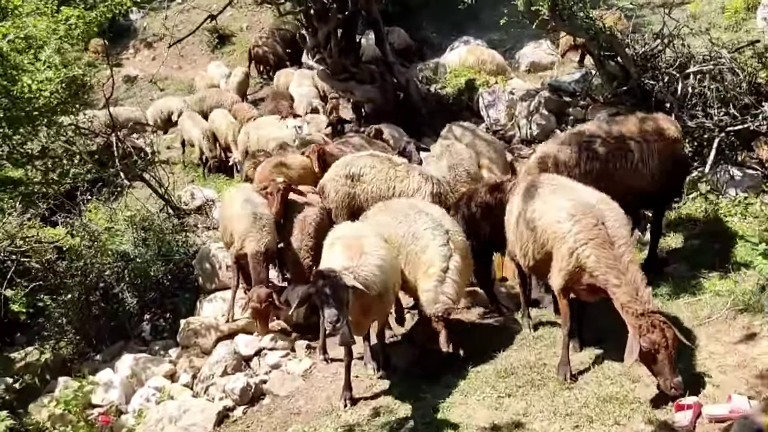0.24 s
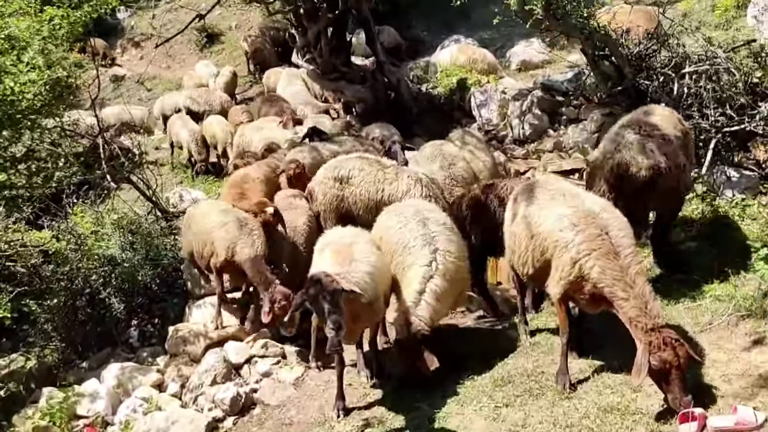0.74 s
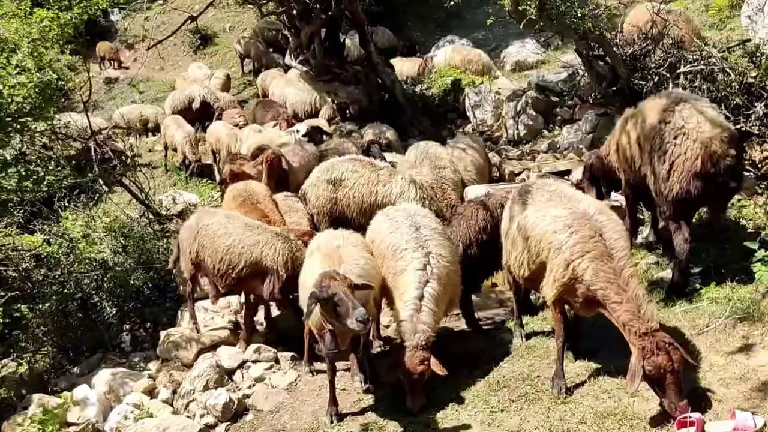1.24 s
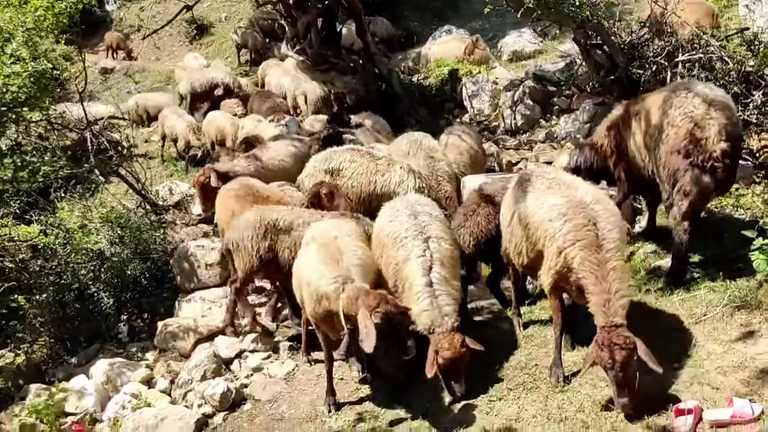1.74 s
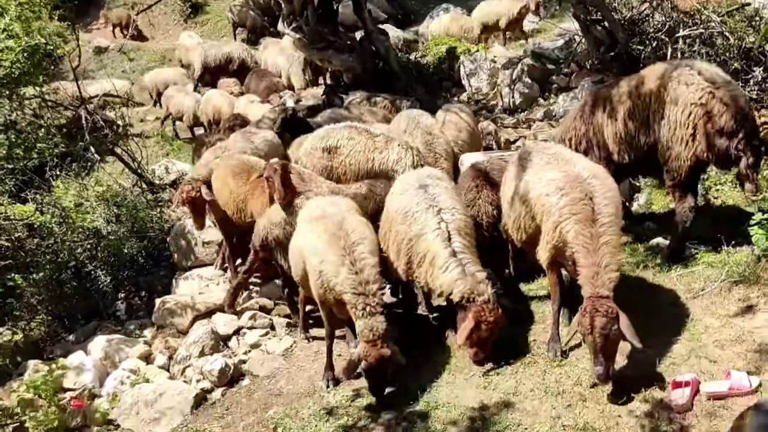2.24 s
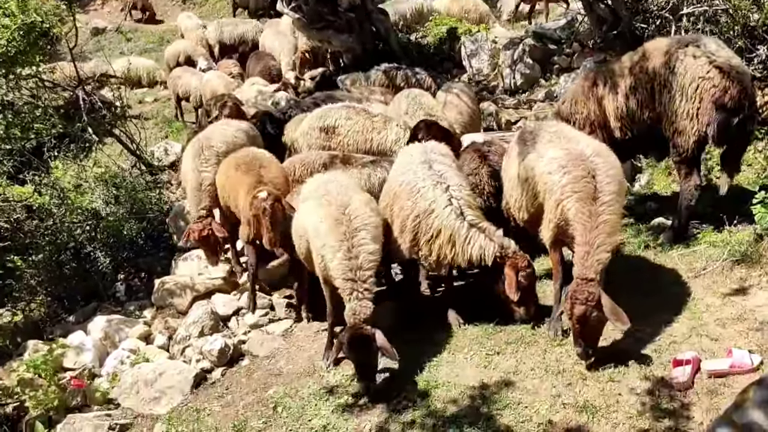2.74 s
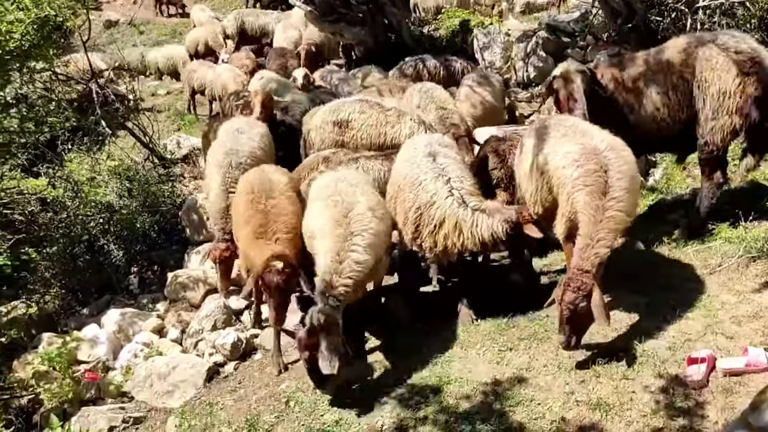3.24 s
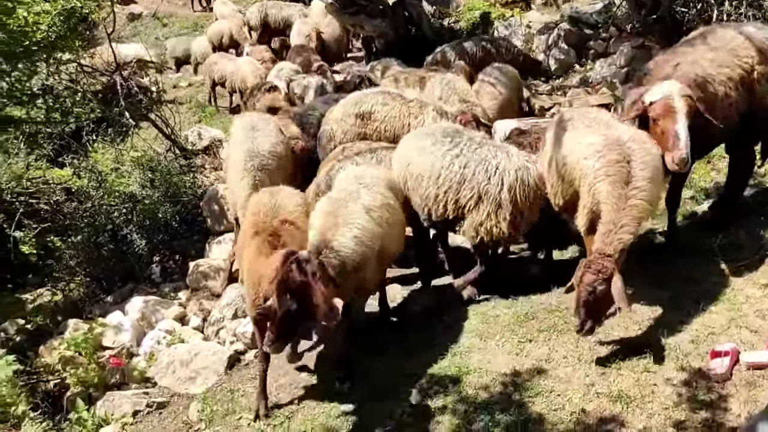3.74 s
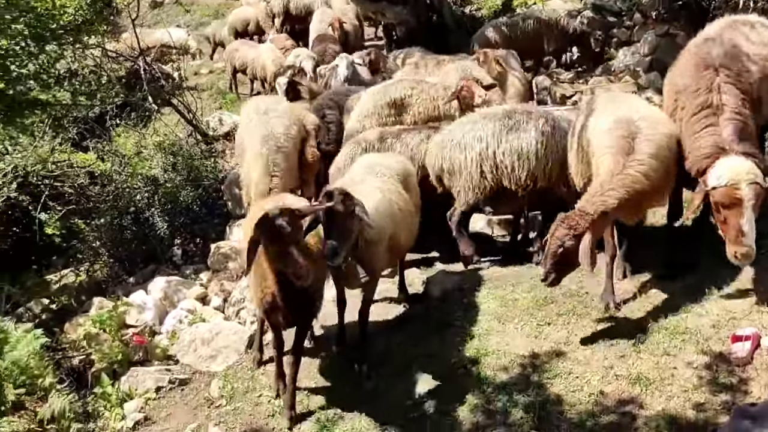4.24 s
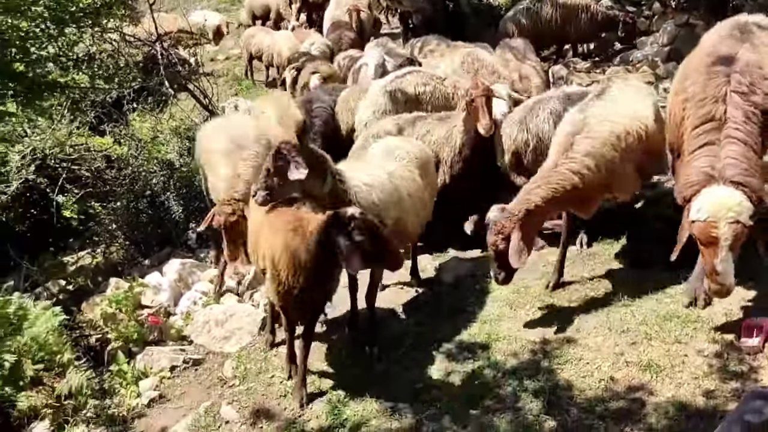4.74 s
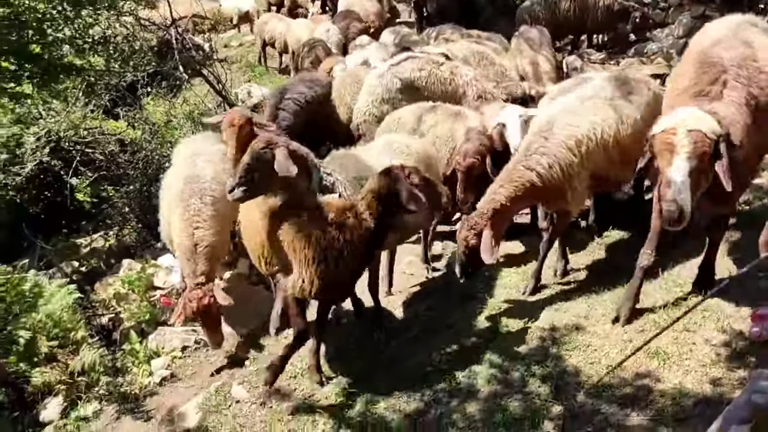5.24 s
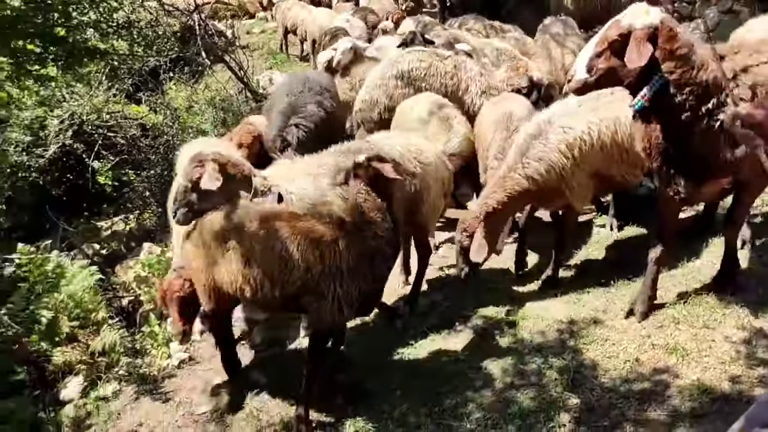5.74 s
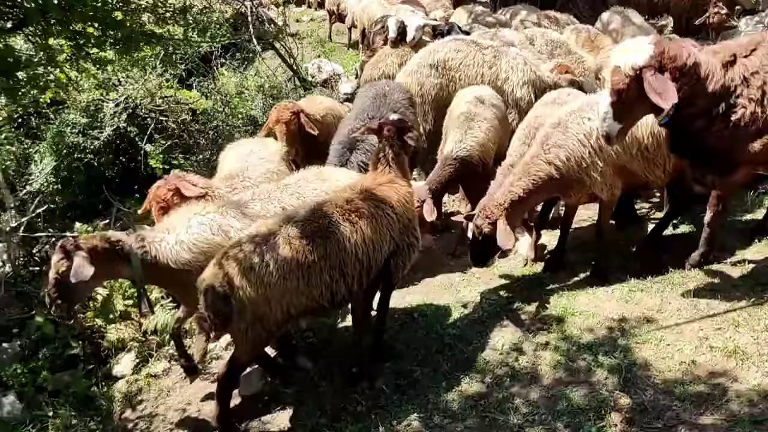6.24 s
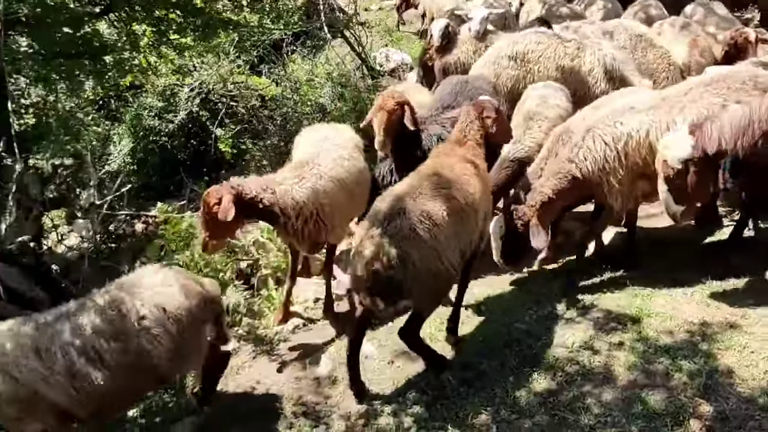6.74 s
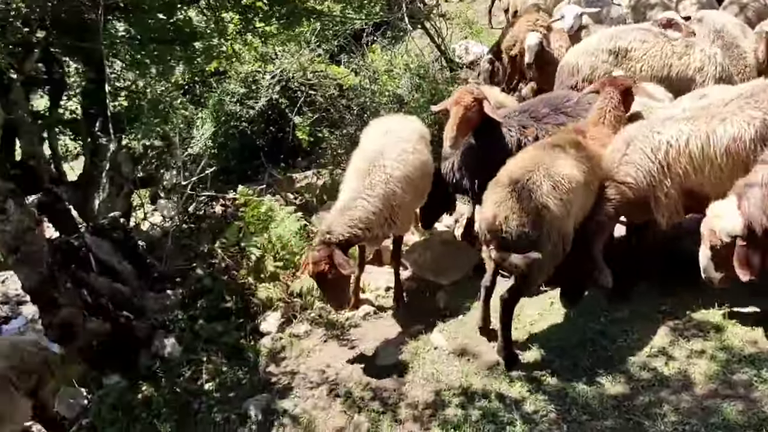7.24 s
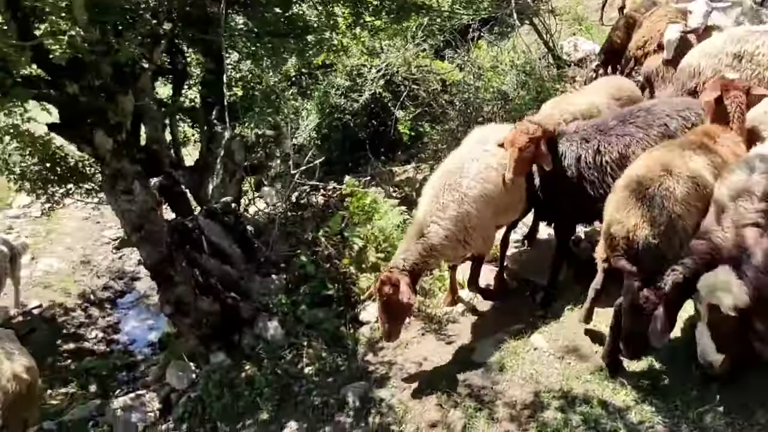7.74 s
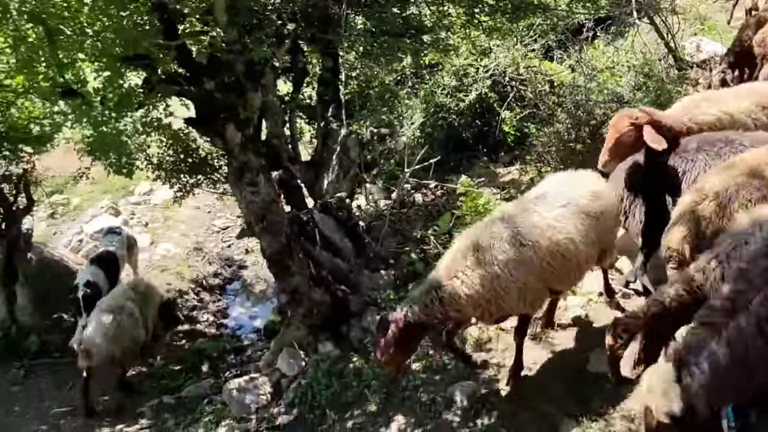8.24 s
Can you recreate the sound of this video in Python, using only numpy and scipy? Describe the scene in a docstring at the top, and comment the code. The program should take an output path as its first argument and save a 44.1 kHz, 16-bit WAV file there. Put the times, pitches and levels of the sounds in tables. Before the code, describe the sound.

A sheep's metal bell clanks close by over hoof knocks, rumbling wind, rustling and a hissing brook.

```python
"""Sheep shuffle over a dry hillside. From the start wind and trampling rumble, a brook hisses and far bells
clink; after a dry click a clapper strikes one close sheet-metal bell, sparsely at first. A small bird gives
a thin rising call at 1.2 s. Wool and cloth brush the microphone at 2.5 s. From 3 to 7 s the bell clanks
thick and fast; hooves knock on earth and stones, and another brush passes near 6 s. The clanks then thin
out, the bird calls twice more, and near 8 s the clapper clicks without ringing and a hoof thuds."""
import sys
import numpy as np
from scipy import signal
from scipy.fft import rfft, irfft, next_fast_len
from scipy.io import wavfile
from scipy.ndimage import map_coordinates

SR = 44100
rng = np.random.default_rng(int(sys.argv[2]) if len(sys.argv) > 2 else 0)


def log_audio(samples):
    """Write samples as a 16-bit WAV file to the path given in sys.argv[1]."""
    # one column per channel
    frames = np.atleast_2d(samples).T
    # limit to full scale, then quantise
    limited = np.clip(frames, -1, 1)
    pcm = np.round(limited * 32767).astype(np.int16)
    wavfile.write(sys.argv[1], SR, pcm)


N = 373968

# noise spectra: freq_hz, level_db
WIND_SPECTRUM = [(11, -9), (18, 4), (76, 0.5), (160, -14.5), (210, -63), (350, -120)]
TRAMPLE_SPECTRUM = [(50, -56), (100, -5), (170, -1.5), (260, -10), (400, -33), (900, -25.5), (2000, -37.5)]
BROOK_SPECTRUM = [(100, 3), (250, 7), (500, 5.5), (900, -0.5), (1500, -1.5), (3000, -15), (5000, -3),
                  (9000, 0.5), (14000, -56)]
RUSTLE_SPECTRUM = [(800, -19), (3000, -35), (4800, -17), (6000, -13), (7400, -3), (8500, 0.5), (10300, 1),
                   (11500, -6), (13800, -10)]
SHUFFLE_SPECTRUM = [(200, -2), (700, -12.5), (1900, -2), (3300, -9.5), (6000, -15)]
GRIT_SPECTRUM = [(200, 1), (600, 6), (1700, 1), (3000, -14.5), (9000, 4), (14000, -20)]
CLICK_SPECTRUM = [(400, -11.5), (1500, 4.5), (2300, 0), (3300, -4.5), (4600, 5.5), (6000, 2), (9500, 11),
                  (13800, 6.5)]
# envelopes: time_s, level_db
WIND_ENVELOPE = [(0.0, -26), (0.88, -34.5), (1.04, -46.5), (2.08, -43), (2.16, -37.5), (2.8, -50),
                 (2.9, -35.5), (3.2, -31.5), (3.28, -42), (3.52, -34), (3.84, -33.5), (3.92, -48),
                 (4.03, -28.5), (4.16, -43.5), (4.5, -39.5), (4.7, -30.5), (5.04, -45), (5.12, -32),
                 (5.36, -33), (5.56, -24.5), (6.96, -43.5), (7.44, -42), (7.52, -34.5), (8.0, -26.5),
                 (8.48, -40)]
RUSTLE_ENVELOPE = [(0.0, -40.5), (0.23, -45.5), (1.89, -50), (2.36, -40.5), (2.48, -33), (2.69, -46),
                   (3.12, -47.5), (5.34, -43), (5.6, -32.5), (5.88, -27), (6.02, -37), (6.21, -43),
                   (6.61, -38), (7.04, -45.5), (7.63, -45), (8.05, -39.5)]
# events: start_s, level_db
BIRD_CALLS = [(1.233, -44), (7.469, -46.5), (8.142, -41.5)]
DRY_CLICKS = [(0.021, -16), (5.3064, -24), (7.9203, -13)]
FAR_BLOWS = [(0.066, -39.5), (0.43, -48), (0.759, -47.5), (1.112, -45), (1.519, -48), (4.913, -51),
             (5.094, -45), (6.138, -45.5)]
# far bell modes: freq_hz, level_db, t60_s
FAR_MODES = [(938, 7.5, 0.47), (4290, -6, 0.19), (4600, -4, 0.22), (5250, 4, 0.57), (6680, -1, 0.21),
             (8200, 0.5, 0.18), (8600, 3.5, .2)]
# bells deep in the flock: cavity_hz, level_db
FLOCK_SIZES = [(796, -54), (823, -50), (902, -54), (932, -52)]
# close brushes: peak_s, width_s, level_db, start_hz, end_hz, width_oct
BRUSHES = [(2.464, 0.019, -24, 8900, 9300, 0.29), (2.506, 0.015, -25.5, 9100, 9100, 0.29),
           (2.486, 0.038, -30.5, 1700, 1490, 5.5), (2.906, 0.013, -42, 1640, 1700, 0.48),
           (5.926, 0.022, -21.5, 9500, 8100, 0.45), (5.945, 0.025, -30.5, 4900, 2730, 0.95),
           (5.025, 0.015, -48, 700, 700, 0.6), (7.495, 0.019, -37, 2540, 1980, 0.22)]
# one hard drag: peak_s, width_s, level_db
DRAG = (2.487, .036, -36.5)
# its resonances: centre_hz, width_hz, level_db
DRAG_MODES = [(228, 46, -9), (394, 42, -10), (578, 88, -17), (890, 160, -15)]
# hooves on earth: start_s, thud_db, grit_db
HOOF_FALLS = [(0.5, -33, -51), (2.91, -34, -41), (3.775, -24, -44.5), (4.772, -22, -53), (5.085, -26, -43),
              (7.957, -16.5, -49)]
# hooves on stone: start_s, push_db, knock_db
STAMPS = [(1.245, -55, -32.5), (5.33, -50, -38), (5.515, -19.5, -28), (5.725, -39, -28),
          (7.716, -19.5, -48)]
# near bell modes: freq_hz, level_in_family_db, left_right_db
NEAR_MODES = [(2842, 0, -1), (3025, 0, 0), (4094, -3, -4), (4352, -2, -7), (4618, -1, -7), (4826, -1, -7),
              (5297, -2, 1), (5372, -2, -2), (6000, -9, 0), (6110, -9, 0), (6331, -8, -2), (6815, -6, -6),
              (7400, -3, -10), (7604, -3, -12), (7950, -4, -12), (8512, 0, -11), (8590, -1, -9),
              (8700, -6, -8), (9625, -5, 2), (9855, 0, 9), (10030, -8, 5), (10514, -8, 7), (11315, -6, 6),
              (11709, -8, 6), (12000, -8, 7), (12269, -8, 5), (13400, -17, 3)]
# borders of the waist, wall, ring and shimmer families: freq_hz
FAMILY_EDGES_HZ = [3500, 6500, 9200]
# modes excited together: wall_hz -> waist_hz
COUPLED_MODES = {4826: 3025, 5372: 3025}
# dense modes of the dented sheet: freq_hz, level_db
CLANG_SPECTRUM = [(1500, -23), (2400, 6.5), (3400, -58), (4600, 18.5), (6000, 2.5), (8000, 23),
                  (11000, -15), (13700, -17)]
# near bell blows: start_s, ring_db, shimmer_db, wall_db, waist_db, cavity_db, click_db,
# favoured_ring_hz, favoured_wall_hz, second_wall_hz
NEAR_BLOWS = [(0.178, -28, -27, -34.5, -67, -50, -22.5, 7604, 4618, 4826),
              (1.287, -29.5, -27, -36, -77, -51, -40, 8590, 4618, 5180),
              (1.6484, -29.5, -31, -41, -67, -50, -26, 7604, 4352, 4826),
              (2.0346, -30.5, -34, -39.5, -89, -49.5, -28, 8590, 4826, 4618),
              (2.25, -14.5, -10.5, -27.5, -47, -23.5, -14.5, 7604, 5297, 4618),
              (2.341, -32, -28, -42, -68, -33, -26, 8512, 4618, 4826),
              (2.6402, -12.5, -12.5, -23.5, -36, -19, -13, 8590, 5297, 4618),
              (3.042, -23, -20, -27.5, -43, -41, -21.5, 8512, 4618, 5330),
              (3.1989, -16, -12, -20.5, -40, -27.5, -17, 7400, 4618, 4826),
              (3.3624, -16, -12, -27.5, -38.5, -21.5, -14.5, 7604, 4352, 4094),
              (3.457, -20, -22.5, -32.5, -67, -30, -20.5, 7400, 4826, 4352),
              (3.5352, -15, -27, -26.5, -40.5, -21.5, -20.5, 7604, 4094, 4826),
              (3.5964, -20.5, -22.5, -31.5, -56, -37.5, -28, 7604, 4352, 5300),
              (3.648, -28, -27, -38, -63, -29.5, -39, 8512, 4826, 5340),
              (3.8528, -10, -9, -22, -39, -16, -14, 7604, 4352, 4094),
              (3.919, -6, -13, -20.5, -35, -20, -12.5, 8512, 4826, 5280),
              (4.0713, -9.5, -7, -28.5, -41, -25.5, -23, 7950, 4618, 4826),
              (4.3007, -5, -10.5, -17.5, -51, -19, -19, 7950, 5372, 4352),
              (4.3998, -22, -26, -33, -57, -24, -27, 7604, 4826, 4094),
              (4.465, -6.5, -13.5, -29, -49, -33.5, -24, 7950, 5297, 4094),
              (4.4881, -17.5, -23, -26.5, -57, -40, -38, 7950, 4352, 5350),
              (4.6695, -20, -26.5, -37, -64, -25.5, -26, 8512, 5372, 4860),
              (4.7046, -19.5, -26, -43, -55, -32, -24, 8512, 4094, 4850),
              (5.6804, -10.5, -11, -29, -54, -39.5, -26, 7400, 5372, 5250),
              (6.0052, -17.5, -21, -33.5, -52, -33, -24, 7950, 4826, 5370),
              (6.2503, -25, -19, -34, -67, -34.5, -41, 8512, 4826, 4400),
              (6.3646, -19.5, -15, -27, -39, -25, -17.5, 7950, 5372, 4826),
              (6.388, -10.5, -22, -34, -47, -32, -41, 8512, 5297, 4826),
              (6.4218, -21, -31, -31, -56, -28, -41, 7950, 4826, 5200),
              (6.6205, -10, -15, -25.5, -49, -11, -16, 8512, 4826, 5460),
              (6.7315, -7.5, -11.5, -27, -40.5, -22, -23, 8512, 4618, 4352),
              (6.825, -33, -33, -34, -57, -37.5, -49, 7950, 4618, 4040),
              (6.943, -16, -12, -27, -43.5, -36, -26, 7950, 5372, 4826),
              (7.016, -20.5, -24, -31, -62, -27, -35, 8512, 4826, 5297),
              (7.1543, -10.5, -17.5, -28.5, -48, -31, -20, 8512, 5297, 4094),
              (7.3369, -25.5, -30, -37, -55, -32, -33, 8512, 4618, 4826),
              (7.664, -31.5, -35, -45, -77, -34.5, -51, 6815, 4618, 4826),
              (7.825, -40, -29.5, -39.5, -69, -38.5, -52, 7604, 5297, 4618),
              (7.9852, -19, -21, -24.5, -46.5, -26.5, -21, 8590, 4618, 4826),
              (8.185, -25.5, -24.5, -32.5, -57, -45, -33, 7950, 4094, 5260),
              (8.372, -31, -34.5, -47, -70.5, -49, -37, 8512, 4618, 5240),
              (8.4616, -12.5, -10, -28.5, -58, -23.5, -14, 7604, 5297, 4800)]


def amp(db):
    """Decibels to gain."""
    return 10 ** (np.asarray(db) / 20)


def unit(x):
    """Scale to rms 1."""
    return x / np.sqrt(np.mean(x ** 2) + 1e-20)


def curve(rows):
    """Breakpoints to one value per sample."""
    return np.interp(np.arange(N) / SR, *np.transpose(rows))


def wobble(rate_hz):
    """Smooth random curve."""
    knots = rng.standard_normal(int(N * rate_hz / SR) + 4)
    return map_coordinates(knots, [np.arange(N) * rate_hz / SR])


def pan(left_right_db):
    """Stereo gains, mean power 1."""
    return unit(amp([[left_right_db / 2], [-left_right_db / 2]]))


def noise(spectrum, correlation, size=N):
    """Coloured stereo noise, rms 1."""
    hz, db = np.transpose(spectrum)
    m = next_fast_len(size)
    gain = amp(np.interp(np.log(np.fft.rfftfreq(m, 1 / SR) + 1), np.log(hz), db))
    mid, side = irfft(rfft(rng.standard_normal((2, m))) * gain, m)[:, :size]
    turn = np.arccos(np.clip(correlation, -1, 1)) / 2
    return unit(np.cos(turn) * mid + np.sin(turn) * np.array([side, -side]))


def add(track, start_s, sound):
    """Mix a sound into the track."""
    start = min(max(round(start_s * SR), 0), N)
    track[:, start:start + sound.shape[-1]] += sound[..., :N - start]


def fade(t, t60_s, attack_s):
    """Quick rise, exponential decay."""
    return 10 ** (-3 * t / t60_s) * (1 - np.exp(-t / attack_s))


def stroke(t, width_s):
    """Smooth swell around t = 0."""
    return np.exp(-.5 * np.abs(t / width_s) ** 2.17)


def patchy(x, depth_db, width_hz, span_s):
    """Patches of the spectrum swell and sink independently."""
    hz, t, spectra = signal.stft(x, SR, nperseg=1024)
    across, along = np.meshgrid(hz / width_hz, t / span_s, indexing="ij")
    knots = rng.standard_normal((int(across.max()) + 2, int(along.max()) + 2))
    field = map_coordinates(knots, [across, along], order=1)
    return unit(signal.istft(spectra * amp(depth_db * unit(field)), nperseg=1024)[1][:, :N])


def catches():
    """Surfaces catch and let go: grainy gain, rms 1."""
    return unit(amp(np.tanh(wobble(700)) + 2 * wobble(70)))


def brook(level_db=-53, ripple_db=1.5):
    """Steady, lightly rippling water hiss."""
    return amp(level_db) * unit(amp(ripple_db * wobble(30)) * noise(BROOK_SPECTRUM, 0.31))


def wind_and_trampling(gust_db=3, lump_db=5.5, patter_db=-11, patter_db_per_db=1.2):
    """Wind buffets each microphone port separately; lumpy patter grows with it."""
    wind_db = curve(WIND_ENVELOPE)
    gusts = amp(gust_db * wobble(16))
    buffet = amp(wind_db) * pan(-2.5) * unit(gusts * noise(WIND_SPECTRUM, 0))
    patter = unit(gusts * amp(lump_db * wobble(45)) * noise(TRAMPLE_SPECTRUM, 0))
    follow_db = wind_db.mean() + patter_db_per_db * (wind_db - wind_db.mean())
    return buffet + amp(follow_db + patter_db) * patter


def rustle(fizz_db=-1, grain_db=2, shuffle_db=-10, shuffle_db_per_db=0.53):
    """Dry grass, wool and cloth rustle in fine grains over the duller shuffle of many feet."""
    level_db = curve(RUSTLE_ENVELOPE)
    grains = amp(grain_db * wobble(400))
    flicker = amp(1.2 * wobble(25))
    stalks = patchy(noise(RUSTLE_SPECTRUM, 0.7), depth_db=2.4, width_hz=170, span_s=.07)
    stalks = patchy(stalks, depth_db=1.6, width_hz=1800, span_s=.04)
    fizz = amp(level_db + fizz_db) * unit(grains * flicker * stalks)
    scuffs = amp(5.1 * wobble(18))
    feet = patchy(noise(SHUFFLE_SPECTRUM, 0.11), depth_db=3, width_hz=200, span_s=.06)
    follow_db = level_db.mean() + shuffle_db_per_db * (level_db - level_db.mean())
    return fizz + amp(follow_db + shuffle_db) * unit(grains * scuffs * feet)


def pebbles(level_db=-47, spread_db=17, centre_hz=1150, spread_oct=1.098, t60_cycles=16, count=420):
    """Tiny knocks of pebbles and dry stalks throughout the flock."""
    out, t = np.zeros((2, N)), np.arange(SR // 25) / SR
    for when, (pitch, size, side) in zip(rng.random(count), rng.standard_normal((count, 3))):
        hz = np.clip(centre_hz * 2 ** (spread_oct * pitch), 250, 12000)
        knock = fade(t, t60_cycles / hz, 0.00091) * np.sin(2 * np.pi * hz * t)
        add(out, when * N / SR, amp(level_db + spread_db * np.tanh(size / 2)) * pan(3 * side) * knock)
    return out


def bird(start_hz=6300, end_hz=7600, length_s=0.1, waver=0.0088):
    """Thin whistle curving upwards."""
    out, progress = np.zeros((2, N)), np.linspace(0, 1, int(length_s * SR))
    for start_s, db in BIRD_CALLS:
        hz = (start_hz + (end_hz - start_hz) * progress ** 2) * (1 + waver * wobble(267)[:len(progress)])
        add(out, start_s, amp(db) * np.sin(np.pi * progress) * np.sin(2 * np.pi * np.cumsum(hz) / SR))
    return out


def far_clink(pitch_ratio, scatter_db=6):
    """One blow on a distant bell; mode shares vary per blow."""
    t = np.arange(SR // 2) / SR
    hz, db, t60_s = np.transpose(FAR_MODES)
    share = amp(db + np.where(hz > 2 * hz[0], scatter_db, 2) * rng.uniform(-1, 1, len(hz)))
    decays = fade(t, t60_s[:, None] * amp(2 * rng.standard_normal()), 0.00035)
    return share @ (decays * np.sin(2 * np.pi * pitch_ratio * hz[:, None] * t))


def far_bells(single_db=-4, flock_db=-6, blows_each=28):
    """One bell a few steps off; the same shape in four sizes jangles across the slope."""
    out = np.zeros((2, N))
    for start_s, db in FAR_BLOWS:
        add(out, start_s, amp(db + single_db) * pan(rng.normal(0, 6)) * far_clink(1))
    for cavity_hz, db in FLOCK_SIZES:
        for slot, (offset, force) in enumerate(rng.random((blows_each, 2))):
            clink = pan(rng.normal(0, 4)) * far_clink(cavity_hz / FAR_MODES[0][0])
            add(out, (slot + offset) * N / SR / blows_each, amp(db + flock_db) * (.5 + force) * clink)
    return out


def hoof_falls(thud_gain_db=-4, grit_gain_db=3):
    """Hooves thump earth and scrape small stones."""
    out, t = np.zeros((2, N)), np.arange(SR // 4) / SR
    for start_s, thud_db, grit_db in HOOF_FALLS:
        earth = noise([(40, -3.5), (110, 3.5), (250, -7.5), (500, -18.5), (1500, -86)], 0.33, len(t))
        grit = noise(GRIT_SPECTRUM, 0.45, len(t)) * catches()[:len(t)]
        add(out, start_s, amp(thud_db + thud_gain_db) * fade(t, 0.11, 0.0028) * earth)
        add(out, start_s, amp(grit_db + grit_gain_db) * fade(t, 0.26, 0.00034) * grit)
    return out


def dry_clicks(gain_db=-6, t60_s=0.039):
    """Sharp dry clicks: short noise bursts."""
    out, t = np.zeros((2, N)), np.arange(SR // 4) / SR
    for start_s, db in DRY_CLICKS:
        burst = fade(t, t60_s, 0.000077) * noise(CLICK_SPECTRUM, 0.14, len(t))
        add(out, start_s, amp(db + gain_db) * burst)
    return out


def stamps(push_hz=150, t60_s=0.043):
    """Heavy hooves: a short push into the ground, a dull knock of stone."""
    out, t = np.zeros((2, N)), np.arange(SR // 8) / SR
    for start_s, push_db, knock_db in STAMPS:
        push = 2 * amp(push_db) * np.sin(2 * np.pi * push_hz * t)
        knock = amp(knock_db) * noise([(250, -8), (600, 0), (1500, -3), (2600, -25)], .8, len(t))
        add(out, start_s, fade(t, t60_s, 0.0017) * (push + knock))
    return out


def brushes():
    """Wool, cloth and hooves brush past: a gliding band of friction noise swells and fades."""
    out, size = np.zeros((2, N)), SR // 2
    half_s = size / SR / 2
    for peak_s, width_s, db, start_hz, end_hz, width_oct in BRUSHES:
        hz, t, spectra = signal.stft(noise([(100, 0), (10000, 0)], .6, size), SR, nperseg=256)
        centre_oct = np.interp(t - half_s, [-width_s, width_s], np.log2([start_hz, end_hz]))
        band = np.exp(-.5 * ((np.log2(hz + 1)[:, None] - centre_oct) / width_oct) ** 2)
        band /= np.linalg.norm(band, axis=0)
        rub = unit(signal.istft(spectra * band, nperseg=256)[1][:, :size])
        add(out, peak_s - half_s, amp(db) * stroke(np.arange(size) / SR - half_s, width_s) * rub)
    return out * catches()


def drag():
    """One hard brush drones: friction noise through low resonances."""
    peak_s, width_s, level_db = DRAG
    hz = np.fft.rfftfreq(N, 1 / SR)
    body = sum(amp(db) / (1 + 2j * (hz - centre_hz) / width_hz) ** 2
               for centre_hz, width_hz, db in DRAG_MODES)
    drone = irfft(rfft(rng.standard_normal(N)) * body, N)
    return amp(level_db) * stroke(np.arange(N) / SR - peak_s, width_s) * unit(drone)


def clapper_click(gain_db=3, t60_s=0.0066, gap_s=0.0052, skip_loss_db=3, count=2):
    """The clapper strikes and skips: hard contacts milliseconds apart."""
    t = np.arange(SR // 20) / SR
    skips_s = np.cumsum(np.append(0, gap_s * rng.uniform(0.47, 1.3, count - 1)))
    contacts = sum(amp(-skip_loss_db * k) * fade(np.maximum(t - start_s, 0), t60_s, 2 / SR)
                   for k, start_s in enumerate(skips_s))
    return amp(gain_db) * contacts * noise(CLICK_SPECTRUM, 0.13, len(t))


def clapper_chatter(hz, size, kick=0.56, gap_s=0.0037, ease=0.92, tilt=0.27, count=14):
    """Each touch jolts every mode's strength and phase, high modes most."""
    touches = np.cumsum(gap_s * rng.uniform(.3, 1.7, count) * SR)
    jolts = rng.standard_normal((len(hz), count)) + 1j * rng.standard_normal((len(hz), count))
    jolts *= kick * (hz[:, None] / hz.mean()) ** tilt * ease ** np.arange(count) / np.sqrt(2)
    state = np.cumsum(np.hstack([np.ones((len(hz), 1)), jolts]), axis=1)
    state /= np.sqrt(np.mean(np.abs(state) ** 2, axis=1, keepdims=True))
    state /= np.sqrt(np.mean(np.abs(state) ** 2, axis=0))  # energy only moves between modes
    return state[:, np.searchsorted(touches, np.arange(size))]


def sheet_clang(t60_s=0.13, count=48):
    """Fresh cluster of dense, short-lived sheet modes."""
    t = np.arange(SR // 7) / SR
    tone_hz, tone_db = np.transpose(CLANG_SPECTRUM)
    hz = np.geomspace(tone_hz[0], tone_hz[-1], count) * np.exp(rng.normal(0, 0.0233, count))
    scatter = rng.standard_normal(count) + 0.74 * rng.standard_normal((2, count))
    share = amp(np.interp(hz, tone_hz, tone_db)) * np.sqrt(hz) * scatter
    modes = np.sin(2 * np.pi * hz[:, None] * t)
    return 2 * share / np.linalg.norm(share) @ modes * fade(t, t60_s, 0.019)


def cavity_tone(pitch_hz=1032, t60_s=0.32, sharp=0.022, settle_s=0.017, burst=1.94, attack_s=0.005):
    """Air in the bell swings up, mostly a little sharp, and loses energy fast at first; complex."""
    t = np.arange(SR // 2) / SR
    fresh = np.exp(-t / (settle_s * amp(2 * rng.standard_normal())))
    hz = pitch_hz * (1 + sharp * rng.uniform(-.3, 2) * fresh)
    flutter = 1 + .35 * np.sqrt(fresh) * (wobble(150) + 1j * wobble(150))[:len(t)]
    envelope = (1 + burst * fresh) * fade(t, t60_s * amp(rng.uniform(-4.5, 0)), attack_s)
    return flutter * envelope * np.exp(2j * np.pi * np.cumsum(hz) / SR)


def lip_tone(gap_s, pitch_hz=1132, t60_s=0.75):
    """The lip hums just above the cavity, beating with it, until the next blow chokes it."""
    t = np.arange(SR // 2) / SR
    choke = np.clip(1 - (t - gap_s) / .01, 0, 1)
    return choke * fade(t, t60_s, .002) * np.sin(2 * np.pi * pitch_hz * t)


def near_bell(favour_db=9, second_db=6, scatter_db=3.5, wall_t60_s=.24, detune=0.00096, lead_s=.0006):
    """Each blow hits another spot of the wall and shares its energy differently among the modes."""
    out, t = np.zeros((2, N)), np.arange(SR // 2) / SR
    hz, mode_db, side_db = np.transpose(NEAR_MODES)
    family = np.digitize(hz, FAMILY_EDGES_HZ)
    t60_s = wall_t60_s * np.minimum(hz[4] / hz, 1)  # high modes die sooner
    ears = np.hstack([pan(db) for db in side_db])
    gaps_s = np.diff([blow[0] for blow in NEAR_BLOWS], append=N / SR)
    for blow, gap_s in zip(NEAR_BLOWS, gaps_s):
        start_s, ring_db, shimmer_db, wall_db, waist_db, cavity_db, click_db, *favoured_hz = blow
        ring_hz, wall_hz, second_hz = (hz[np.abs(hz - f).argmin()] for f in favoured_hz)
        favoured = np.isin(hz, [ring_hz, wall_hz, COUPLED_MODES.get(wall_hz, hz[0])])
        boost_db = favour_db * favoured + second_db * (hz == second_hz)
        share = amp(mode_db + boost_db + scatter_db * rng.standard_normal(len(hz)))
        share /= np.sqrt(np.bincount(family, share ** 2))[family]
        force = amp([waist_db - 3, wall_db - 1, ring_db - 1.5, shimmer_db - 1.5])[family]
        # wool and collar: damping varies per blow
        damped_t60_s = t60_s * amp(2 * rng.standard_normal(len(hz)))
        decays = fade(t, damped_t60_s[:, None], 0.001) * clapper_chatter(hz, len(t))
        # swing: phase varies per ear, pitch per blow
        phase = rng.uniform(0, 2 * np.pi, len(hz)) + rng.standard_normal((2, len(hz)))
        modes = decays * np.exp(2j * np.pi * hz[:, None] * rng.normal(1, detune) * t)
        metal = (ears * share * force * np.exp(1j * phase)) @ modes
        facing = pan(rng.normal(.5, 2))
        ear_phase = rng.choice([-1, 1]) * rng.uniform(.4, .8) * np.array([[1], [-1]])
        air = amp(cavity_db) * facing * np.exp(1j * ear_phase) * cavity_tone()
        lip = amp(wall_db - 22 + rng.uniform(-6, 6)) * lip_tone(gap_s)
        click = amp(click_db) * clapper_click()
        clang = amp((wall_db + shimmer_db) / 2 - 1) * sheet_clang()
        for part in ((metal + air).imag, lip, click, clang):
            add(out, start_s - lead_s, part)
    return out


def slope_echo(x, level_db=-21, t60_s=0.083):
    """Rocks and trees scatter a faint, short echo."""
    t = np.arange(SR // 2) / SR
    tail = rng.standard_normal((2, len(t))) * fade(t, t60_s, 0.0093)
    return amp(level_db) * signal.fftconvolve(x, tail / np.linalg.norm(tail[0]), axes=1)[:, :N]


def scene():
    """Bells, steps, clicks and bird with echo; brushes and hillside noise without."""
    direct = near_bell() + far_bells() + hoof_falls() + dry_clicks() + stamps() + pebbles() + bird()
    return direct + slope_echo(direct) + brushes() + drag() + wind_and_trampling() + brook() + rustle()


def record(dry, ceiling=.85, top_hz=14250):
    """Soft peak limit, then a steep low-pass."""
    rounded = dry / (1 + np.abs(dry / ceiling) ** 6) ** (1 / 6)
    m = next_fast_len(N + SR // 2)
    hz = np.fft.rfftfreq(m, 1 / SR)
    return irfft(rfft(rounded, m) / np.sqrt(1 + (hz / top_hz) ** 200), m)[:, :N]


dry = scene()
out = record(dry)
log_audio(out)
```